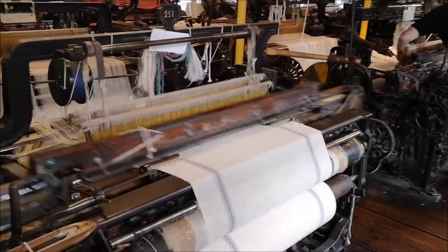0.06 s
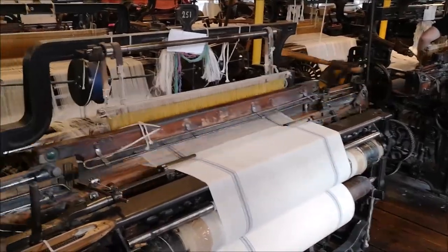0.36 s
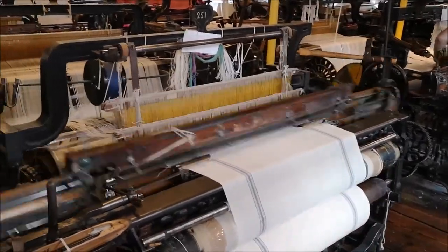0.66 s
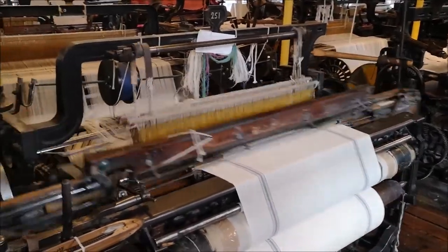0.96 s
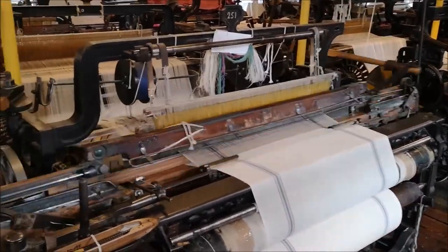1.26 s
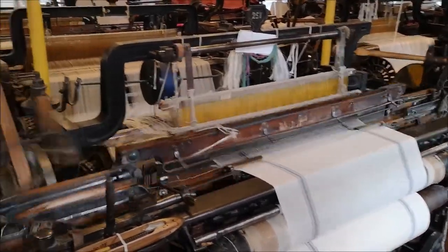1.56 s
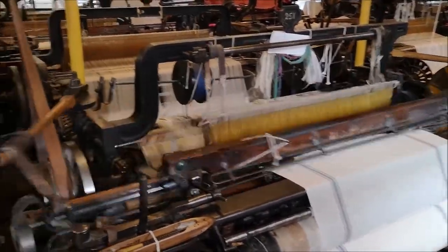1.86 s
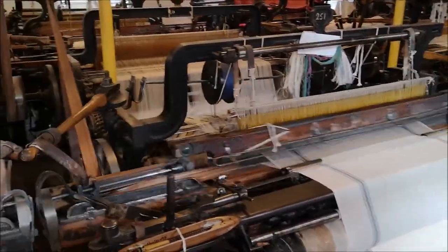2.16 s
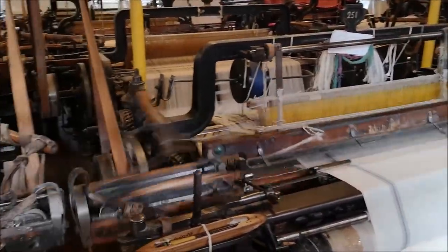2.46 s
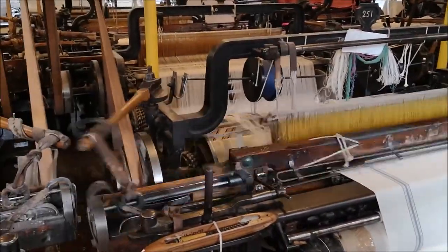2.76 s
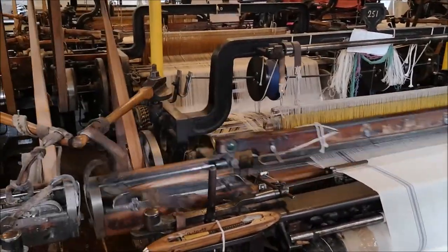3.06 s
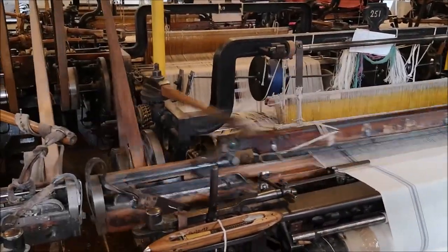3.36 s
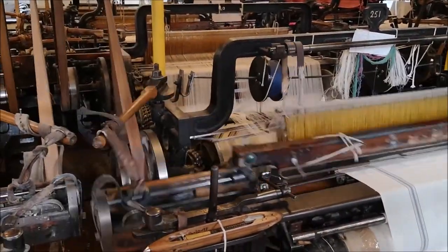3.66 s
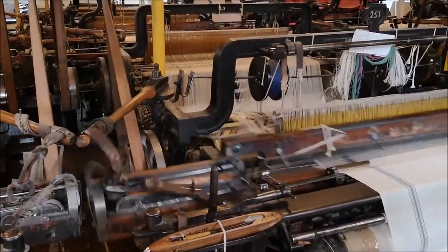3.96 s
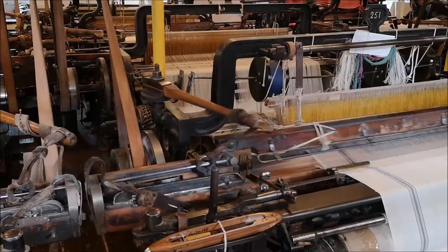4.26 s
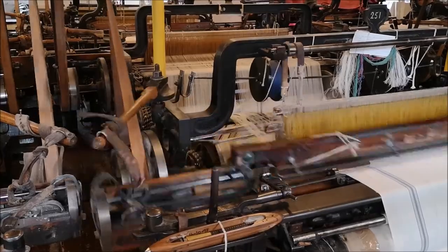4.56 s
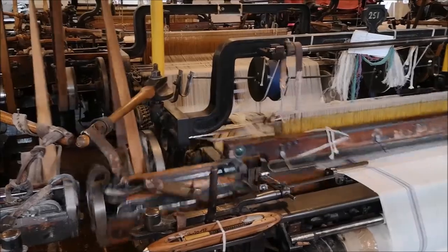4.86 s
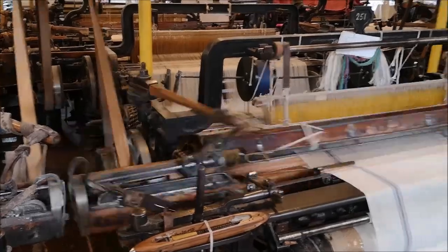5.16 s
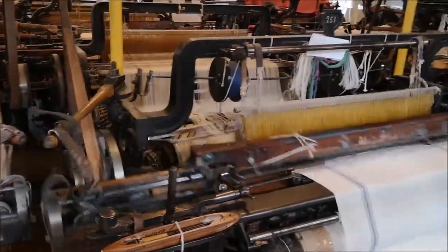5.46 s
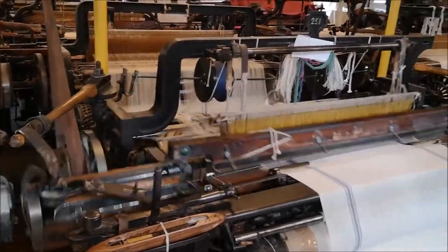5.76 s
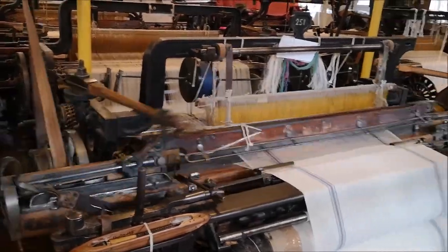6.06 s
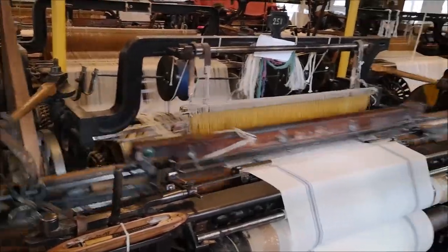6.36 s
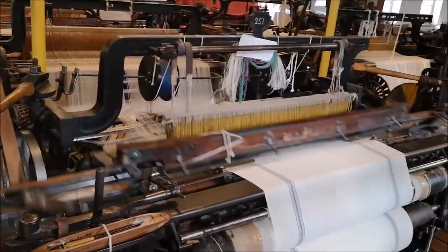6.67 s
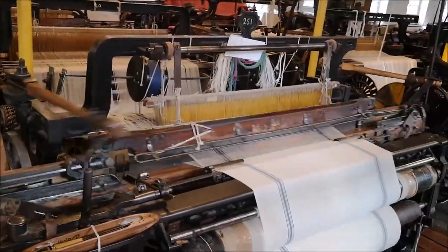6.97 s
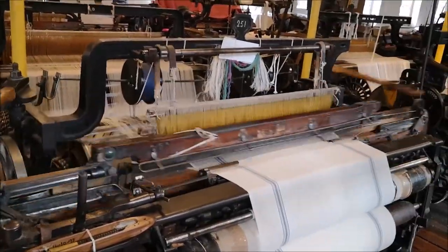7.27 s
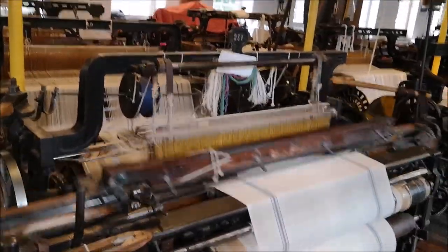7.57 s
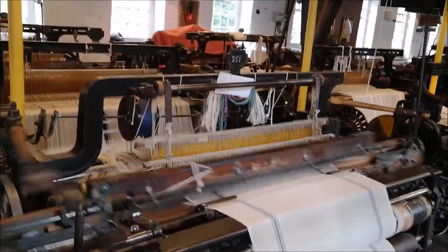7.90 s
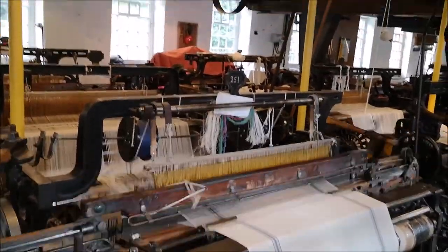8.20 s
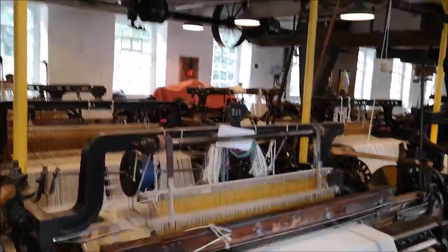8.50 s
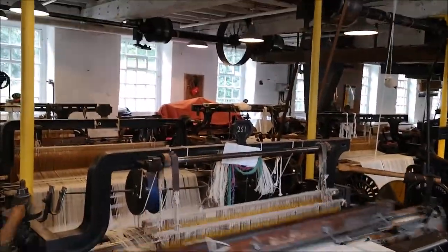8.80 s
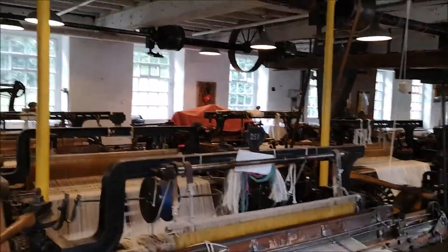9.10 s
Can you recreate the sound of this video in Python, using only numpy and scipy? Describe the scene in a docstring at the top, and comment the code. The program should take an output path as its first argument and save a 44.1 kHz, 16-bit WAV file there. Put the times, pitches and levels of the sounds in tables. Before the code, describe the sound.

A belt-driven shuttle loom runs steadily, close to a stereo microphone in a large mill room. A hard wooden knock, iron clanks, a sharp double crack and the slap of the shuttle repeat in the same order a little faster than once a second. Between the blows, gears grind, a dry bearing squeaks faintly and the heavy frame thuds and rumbles. Farther off, other machines blend into a constant roar.

```python
"""Wooden knocks and iron clanks from a belt-driven shuttle loom, close to a stereo mic in a large mill room.
The shaft turns about 68 times a minute. Every turn (two picks: shuttle out and back) repeats one train
of blows, each dying away in the frame and the room. Between them the gears grind, a dry bearing squeaks
and the frame shakes the floor; farther off, the hall roars."""
import sys
import numpy as np
from scipy import signal
from scipy.fft import rfft, irfft, next_fast_len
from scipy.io import wavfile
from scipy.ndimage import map_coordinates

SR = 44100
rng = np.random.default_rng(int(sys.argv[2]) if len(sys.argv) > 2 else 0)


def transcribe(u):
    """Save the signal u as a 16-bit wav file named by the first command-line argument.

    u: samples, shape (n,) or (channels, n), limited to [-1, 1]; the rate is SR.
    q: integer samples, one column per channel.
    """
    v = np.clip(np.atleast_2d(u).T, -1, 1)
    q = np.round(v * 32767).astype(np.int16)
    wavfile.write(sys.argv[1], SR, q)


N = 411894

# Turns of the shaft, never quite even:
# (knock [s], crack [s], bump [s], slap [s], shuttle box tock [dB], squeak [dB])
SHAFT_TURNS = [(-0.274, 0.102, 0.16, 0.484, -1, -3), (0.61, 0.983, 1.038, 1.364, -5, -12),
               (1.478, 1.861, 1.93, 2.242, 3.5, 0), (2.368, 2.753, 2.806, 3.126, -1, 2),
               (3.242, 3.623, 3.672, 3.998, 2, 1), (4.123, 4.507, 4.555, 4.878, 1.5, -2),
               (5.006, 5.392, 5.437, 5.765, -5, -2), (5.881, 6.251, 6.302, 6.631, 0, 2.5),
               (6.75, 7.135, 7.181, 7.506, 2.5, 2.5), (7.63, 8.011, 8.061, 8.38, -12, 4.5),
               (8.498, 8.882, 8.932, 9.262, -7, 0)]
# The four main blows of a turn: (time after the knock [s], level [dB])
KNOCK_HITS = [(-.013, -25), (0, -14.5)]
CRACK_HITS = [(.381, -11.5)]
BUMP_HITS = [(.431, -11)]
SLAP_HITS = [(.745, -20), (.756, -12)]
# What small loose steel parts radiate: (frequency [Hz], level [dB])
LOOSE_STEEL_BODY = [(550, -38), (850, -15), (1250, -11), (1800, -42), (2600, 11.5), (3600, -5), (4700, 6),
                    (5900, -8), (7600, -6), (10000, -8), (12000, -7), (14500, -18)]


def amp(db):
    return 10 ** (np.asarray(db) / 20)


def unit(x):
    return x / np.sqrt(np.mean(x ** 2) + 1e-20)


def fade(t, t60):
    """Amplitude that falls 60 dB in t60 seconds."""
    return np.exp(-np.log(1000) * t / t60)


def along(points, hz):
    """Interpolate (frequency [Hz], value) points on a log axis."""
    freqs, values = np.transpose(points)
    return np.interp(np.log(hz + 1), np.log(freqs + 1), values)


def wobble(rate, size=N):
    """A smooth random curve, rate knots a second."""
    knots = rng.standard_normal(int(size * rate / SR) + 4)
    return map_coordinates(knots, [np.arange(size) * rate / SR], order=2)


def add(track, s, sound):
    """Mix a sound into a track at time s."""
    start = max(round(s * SR), 0)
    part = track[..., start:start + sound.shape[-1]]
    part += sound[..., :part.shape[-1]]


def filtered(x, response):
    """Filter x by a response given as a function of frequency."""
    size = next_fast_len(N + SR // 4, True)
    return irfft(rfft(x, size) * response(np.fft.rfftfreq(size, 1 / SR)), size)[..., :N]


def small_part(hz, corner_hz=720):
    """Machine parts radiate little below their first resonance."""
    return 1 / np.sqrt(1 + (corner_hz / (hz + 1)) ** 6)


def times_of(delay):
    """When a point of the cycle comes round in each turn, early or late with the main blows."""
    marks = np.array([hits[-1][0] for hits in (KNOCK_HITS, CRACK_HITS, BUMP_HITS, SLAP_HITS)])
    return np.array([delay + np.interp(delay, marks, turn[:4] - marks) for turn in SHAFT_TURNS])


def every_turn(hits, turn_db=0):
    """One part's blows in all turns, each turn stronger by turn_db: (time [s], level [dB])."""
    return [(s, level) for delay, db in hits
            for s, level in zip(times_of(delay), np.full(len(SHAFT_TURNS), db) + turn_db)
            if 0 < s < N / SR]


def rush(gain):
    """Diffuse room noise of rms 1, alike left and right only in the bass."""
    likeness = [(30, .99), (150, 0.97), (260, 0.94), (500, 0.0058), (1000, 0.35), (2000, 0.016), (12000, 0)]  # (frequency [Hz], left-right correlation [ratio])

    def mid_and_side(hz):
        angle = np.arccos(np.clip(along(likeness, hz), -1, 1)) / 2
        return gain(hz) * np.array([np.cos(angle), np.sin(angle)])

    mid, side = filtered(rng.standard_normal((2, N)), mid_and_side)
    return unit(np.array([mid + side, mid - side]))


def through(x, body, ripple_db, size=2048):
    """Pass x through a struck part's unit-energy response; its crowded modes differ left and right."""
    steel = [(3680, 130, 4), (5500, 1050, 4.5), (7410, 950, 5), (9390, 710, 5), (11420, 350, 5),
             (13600, 450, 8.5)]  # broad resonances of the loom: (centre [Hz], width [Hz], lift [dB])
    hz = np.fft.rfftfreq(size, 1 / SR)
    modes = np.array([np.interp(hz, np.linspace(0, SR / 2, 400), rng.standard_normal(400)) for _ in x])
    steel_db = sum(lift_db / (1 + (2 * (hz - centre) / width) ** 2) for centre, width, lift_db in steel)
    magnitude = amp(along(body, hz) + steel_db + ripple_db * modes) * small_part(hz)
    cepstrum = irfft(np.log(magnitude + 1e-4))
    cepstrum[:, 1:size // 2] *= 2  # minimum phase: nothing sounds before the blow
    cepstrum[:, size // 2 + 1:] = 0
    response = irfft(np.exp(rfft(cepstrum)))
    response /= np.linalg.norm(response, axis=1, keepdims=True)
    return signal.oaconvolve(x, response, axes=1)[:, :N]


def blows(hits, body, t60, snap_db, pan_db=0, lead_db=-22, bounce=.008, rise=.0071, ripple_db=4.5):
    """Each blow takes up slack, snaps and rebounds; frame and room scatter it into a rattling tail."""
    track, t = np.zeros((2, N)), np.arange(SR // 3) / SR
    tail = fade(t, t60) * (1 - np.exp(-t / rise))
    contact = fade(t[:1024], .019)
    touch = lambda: rng.standard_normal((2, 1024)) * contact
    for s, usual_db in every_turn(hits):
        db = usual_db + rng.normal(0, .53)  # no blow is quite as hard as the last
        rattle = np.repeat(amp(rng.standard_normal(100)), len(t) // 100)
        sound = rng.standard_normal((2, len(t))) * rattle * tail
        contact_times = np.r_[0, np.cumsum(bounce * rng.uniform(.4, 1.6, size=4))]
        for rebound, delay in enumerate(contact_times):
            add(sound, delay, amp(snap_db - 4.8 * rebound + rng.normal(0, 1)) * touch())
        add(track, s, amp(db) * sound)
        for early in rng.uniform(.0014, .017, size=3):  # light touches as the slack closes
            add(track, s - early, amp(db + lead_db) * touch())
    return through(track, body, ripple_db) * amp([[pan_db / 2], [-pan_db / 2]])


def ring(hits, modes, gain_db, rise, blur, scatter_db=2, spread=1, turn_db=0):
    """Each blow rings modes (frequency [Hz], level [dB], t60 [s]); loose joints blur their pitch."""
    track = np.zeros((2, N))
    for hz, mode_db, t60 in modes:
        t = np.arange(int(min(t60, .2) * SR)) / SR
        envelope = fade(t, t60) * (1 - np.exp(-t / rise))
        for s, db in every_turn(hits, turn_db):
            drift = blur * np.cumsum(rng.standard_normal(9000))[:len(t)] / np.sqrt(SR / 100)
            gains = amp(db + gain_db + mode_db + scatter_db * rng.standard_normal((2, 1)))
            phase = rng.uniform(0, 2 * np.pi) + spread * rng.standard_normal((2, 1))  # spaced mic ports
            add(track, s, gains * np.sin(2 * np.pi * hz * t + drift + phase) * envelope)
    return track


def hall():
    """Line shafts and far machines blend into a roar."""
    spectrum = [(550, -8), (850, -5.5), (1250, -2.5), (1800, 4), (2600, -5), (3600, -7), (4700, -8.5),
                (5900, -7.5), (7600, -14.5), (10000, -20), (12000, -33), (14500, -50)]  # (frequency [Hz], level [dB])
    return amp(-28 + .41 * wobble(12)) * rush(lambda hz: amp(along(spectrum, hz)) * small_part(hz))


def strain():
    """Amplitudes of floor, frame and gears: each heavy stroke builds up, holds and dies away."""
    strokes = [(-.018, 0.274, -27, -26, -22), (.27, 0.336, -25.5, -27.5, -44),
               (0.421, 0.585, -26.5, -30.5, -23.5), (0.555, 0.713, -26, -23, -20.5)]  # in one turn: (begin [s], end [s], floor [dB], frame [dB], gears [dB])
    idle_db, release_t60 = (-32, -38.5, -36.5), np.array([.19, .4, .3])  # floor, frame, gears
    attack_s = .048
    t = np.arange(SR // 2) / SR
    power = np.zeros((3, N + SR)) + amp(idle_db)[:, None] ** 2
    for begin, end, *levels_db in strokes:
        release = fade(np.maximum(t - (end - begin), 0), release_t60[:, None])
        swell = np.minimum(t / attack_s, 1) * release
        for s in times_of(begin):
            add(power, s + 1, (amp(levels_db)[:, None] * swell) ** 2)  # 1 s lead: already weaving
    return np.sqrt(power[:, SR:])


def drive():
    """The load of each pick shakes the floor, booms in the frame and makes the gear teeth chatter."""
    # Noise spectra: (frequency [Hz], level [dB])
    floor = [(8, -35), (18, 14), (27, -2), (42, -4), (58, -3), (90, -17), (200, -68)]
    frame = [(45, -12), (68, -5.5), (86, -8), (101, -1), (120, -5), (140, 0.5), (158, -2), (176, -3),
             (195, -6.5), (235, -7.5), (275, -10), (298, -8.5), (335, -12), (520, -20.5), (900, -68)]
    gears = [(550, -5.5), (850, -0.5), (1250, -1.5), (1800, 2), (2600, -1.5), (3600, -8), (4700, -11.5),
             (5900, -9), (7600, -27.5), (10000, -26), (12000, -48), (14500, -56)]
    on_floor, on_frame, on_gears = strain()
    shake = on_floor * rush(lambda hz: amp(along(floor, hz)))
    boom = on_frame * rush(lambda hz: amp(along(frame, hz)))
    chatter = unit(amp(1.9 * wobble(220)))
    grind = on_gears * chatter * rush(lambda hz: amp(along(gears, hz)) * small_part(hz))
    return shake + boom + grind


def frame_thuds():
    """The heavy frame is jolted as the sley swings and the shuttle is thrown."""
    jolts = [(.025, -22), (.11, -23.5), (.2, -23.5), (.605, -19.5), (.67, -18.5)]  # (time after the knock [s], level [dB])
    modes = [(101.2, -3.5, 0.4), (139.7, 0.5, .4), (175.6, -1.5, 0.35)]  # (frequency [Hz], level [dB], t60 [s])
    return ring(jolts, modes, gain_db=-2.5, rise=.014, blur=.46, scatter_db=.8, spread=.1)


def bearing():
    """A dry bearing gives short rough squeaks at the same points of every turn, each a little different."""
    squeaks = [(.125, .06, 1480, 1640, -22), (.235, .04, 1560, 1510, -28), (.56, .05, 1930, 1990, -27),
               (.645, .07, 1515, 1510, -25)]  # (time after the knock [s], length [s], from [Hz], to [Hz], level [dB])
    track = np.zeros((2, N))
    for delay, length, from_hz, to_hz, db in squeaks:
        for s, turn_db in zip(times_of(delay), np.array(SHAFT_TURNS)[:, -1]):
            progress = np.linspace(0, 1, int(length * SR))
            pitch = (from_hz + (to_hz - from_hz) * progress) * rng.normal(1, .013)
            grip = np.array([wobble(170, len(progress)) for _ in track])
            phase = 2 * np.pi * np.cumsum(pitch) / SR + .8 * grip
            rough_db = db + turn_db + rng.normal(2, 1) + 3 * wobble(200, len(progress))
            if s > 0:
                add(track, s, amp(rough_db) * np.sin(np.pi * progress) * np.sin(phase))
    return track


def loose_steel():
    """Small loose steel parts jingle left of the mic."""
    hits = [(.361, -23)]  # (time after the knock [s], level [dB])
    return blows(hits, LOOSE_STEEL_BODY, t60=.35, snap_db=7, pan_db=6.5)


def pawl():
    """A pawl ticks drily on the left, then drops home with a click."""
    # Its two contacts: (time after the knock [s], level [dB])
    tick = [(.177, -18)]
    click = [(.196, -15)]
    # What each radiates: (frequency [Hz], level [dB])
    tick_body = [(550, 0), (850, 9), (1250, 11), (1800, -4), (2600, 14.5), (3600, 4), (4700, -3),
                 (5900, -8), (7600, -5), (10000, -16), (12000, -14), (14500, -20)]
    click_body = [(550, -7), (850, -23), (1250, 1), (1800, 6), (2600, -4), (3600, 9.5), (4700, -3.5),
                  (5900, 1), (7600, -2), (10000, -5.5), (12000, -7.5), (14500, -18)]
    return (blows(tick, tick_body, t60=.16, snap_db=2, pan_db=6, rise=.001)
            + ring(tick, [(4760, 0, .025), (8650, -1.7, .044)], gain_db=-.5, rise=.0012, blur=1.4)
            + blows(click, click_body, t60=.3, snap_db=3.5, pan_db=.5)
            + ring(click, [(3380, 0, .09), (3950, -1, .082)], gain_db=-4, rise=.0027, blur=3.1))


def heald_frames():
    """The heald frames clack lightly."""
    hits = [(.312, -16)]  # (time after the knock [s], level [dB])
    body = [(550, -7.5), (850, 6), (1250, 5), (1800, 4.5), (2600, 13.5), (3600, 4), (4700, 0.5), (5900, 3),
            (7600, -5), (10000, -4), (12000, -7), (14500, -25)]  # (frequency [Hz], level [dB])
    return (blows(hits, body, t60=.24, snap_db=3.5, lead_db=-24)
            + ring(hits, [(1946, 2, .4), (3880, -3, .3)], gain_db=-7, rise=.0014, blur=2))


def linkage():
    """The iron linkage clanks once in each pick and sings on."""
    hits = [(.079, -13), (.508, -13.3)]  # (time after the knock [s], level [dB])
    body = [(550, -2), (850, 1), (1250, -1.5), (1800, 8), (2600, 1.5), (3600, -4), (4700, -4), (5900, -2.5),
            (7600, -7.5), (10000, -13.5), (12000, -18), (14500, -28)]  # (frequency [Hz], level [dB])
    iron_modes = [(4046, 2, .38), (6022, 3.5, .36), (7245, -3.5, .35), (8557, -4, .35), (9582, -7, .35),
                  (11396, -15, .35), (12760, -16, .3)]  # (frequency [Hz], level [dB], t60 [s])
    return (blows(hits, body, t60=.36, snap_db=2, pan_db=.5, rise=.0038)
            + ring(hits, iron_modes, gain_db=-10, rise=.026, blur=1.2)
            + ring(hits, [(850, 0, .069)], gain_db=-3.5, rise=.0047, blur=2.2))


def picking_stick():
    """The picking stick drives the shuttle and rebounds."""
    hits = [(.598, -13), (.629, -24)]  # (time after the knock [s], level [dB])
    body = [(550, -8), (850, -12.5), (1250, -3.5), (1800, 5), (2600, -1.5), (3600, -6), (4700, -12),
            (5900, -10), (7600, -14.5), (10000, -19.5), (12000, -22.5), (14500, -33)]  # (frequency [Hz], level [dB])
    modes = [(2657, -1, .15), (2745, 8, .012), (1755, 6, .019), (994, -6, .37)]
    return (blows(hits, body, t60=.41, snap_db=4.5, lead_db=-30, rise=.0066)
            + ring(hits, modes, gain_db=-5, rise=.00026, blur=1.75))


def shuttle():
    """The steel-tipped shuttle grazes its box and lands with a slap; the box answers with a tock."""
    body = [(550, -7), (850, 6), (1250, -2.5), (1800, 9), (2600, 9), (3600, 5), (4700, 3.5), (5900, 4),
            (7600, -0.5), (10000, -8.5), (12000, -13), (14500, -17)]  # (frequency [Hz], level [dB])
    box, tock_db = [(833, 0, .11)], np.array(SHAFT_TURNS)[:, -2]
    wood = [(3390, -7, .28), (1006, -4, .12), (1914, -2, .28)]
    steel_tip = [(9020, 0, .08), (10800, -1, .04), (13400, -7, .04)]
    return (blows(SLAP_HITS, body, t60=.24, snap_db=2.5, pan_db=2.3, lead_db=-30, ripple_db=2.5)
            + ring(SLAP_HITS, box, gain_db=-6.5, rise=.002, blur=1.2, spread=.5, turn_db=tock_db)
            + ring(SLAP_HITS, wood, gain_db=-8.5, rise=.00087, blur=1.1)
            + ring(SLAP_HITS, steel_tip, gain_db=-6, rise=.0027, blur=2))


def wood_knock():
    """A soft nudge, then the hard wooden knock that opens the turn."""
    body = [(550, -11), (850, -2.5), (1250, -3.5), (1800, 3), (2600, 1.5), (3600, -8), (4700, -10.5),
            (5900, -10.5), (7600, -12), (10000, -18.5), (12000, -21.5), (14500, -33)]  # (frequency [Hz], level [dB])
    wood = [(1805, 0, .075), (1450, -8, .03)]
    sheen = [(7230, 0, .22), (8565, -6, .22), (12760, -12, .22)]
    return (blows(KNOCK_HITS, body, t60=.52, snap_db=-1, pan_db=.5, lead_db=-15)
            + ring(KNOCK_HITS, wood, gain_db=8, rise=.0007, blur=1.8, scatter_db=1, spread=.3)
            + ring(KNOCK_HITS, sheen, gain_db=-16, rise=.008, blur=1.8))


def wood_crack():
    """A bright first touch, then a sharp wooden crack in mid-turn."""
    first_touch = [(.373, -19.5)]  # (time after the knock [s], level [dB])
    body = [(550, -10), (850, 5), (1250, 1.5), (1800, 14), (2600, 6.5), (3600, 6), (4700, -2), (5900, 1),
            (7600, -9), (10000, -12.5), (12000, -16), (14500, -26)]  # (frequency [Hz], level [dB])
    wood = [(1820, 4, .028), (1480, -17, .0081), (4090, -6, .024)]
    return (blows(CRACK_HITS, body, t60=.32, snap_db=5)
            + blows(first_touch, LOOSE_STEEL_BODY, t60=.044, snap_db=6, pan_db=-5, bounce=.0023, rise=.001)
            + ring(CRACK_HITS, wood, gain_db=2, rise=.00064, blur=1.4))


def wood_bump():
    """The wood knocks once more, just after the crack."""
    body = [(550, -5), (850, 2.5), (1250, 3.5), (1800, 11), (2600, 2), (3600, -1), (4700, -5), (5900, -4),
            (7600, -7.5), (10000, -14), (12000, -19.5), (14500, -25)]  # (frequency [Hz], level [dB])
    wood = [(1794, -1, .049), (1390, -6, .01)]
    return (blows(BUMP_HITS, body, t60=.34, snap_db=1.5, pan_db=1, lead_db=-13)
            + ring(BUMP_HITS, wood, gain_db=4, rise=.00043, blur=2.4, scatter_db=1.5, spread=.33))


def scene():
    """The loom up close, the hall behind it."""
    woodwork = wood_knock() + wood_crack() + wood_bump() + picking_stick() + shuttle() + heald_frames()
    ironwork = linkage() + pawl() + loose_steel()
    return woodwork + ironwork + drive() + frame_thuds() + bearing() + hall()


def record(dry):
    """Two mic ports of unlike colour, a soft ceiling near full scale and a steep band limit."""
    balance = [(60, 0.0), (92, 0), (140, -0.5), (210, 1), (330, -1), (500, -1), (770, 1.5), (1170, -0.5),
               (1790, -2), (2740, 1), (4190, -4), (6410, -2.5), (9810, 5.5), (15000, -4.5)]  # (frequency [Hz], left minus right [dB])
    ceiling, top_hz = .92, 15400
    ports = filtered(dry, lambda hz: amp(along(balance, hz) * np.array([[.5], [-.5]])))
    rounded = ports / (1 + np.abs(ports / ceiling) ** 6) ** (1 / 6)
    return filtered(rounded, lambda hz: hz < top_hz)


dry = scene()
out = record(dry)
transcribe(out)
```